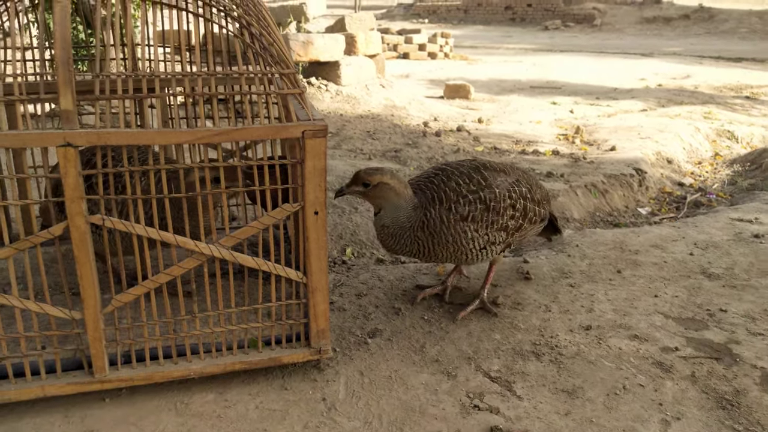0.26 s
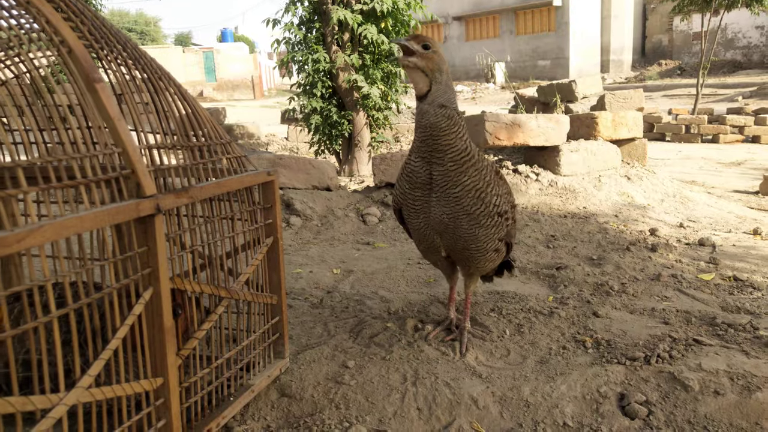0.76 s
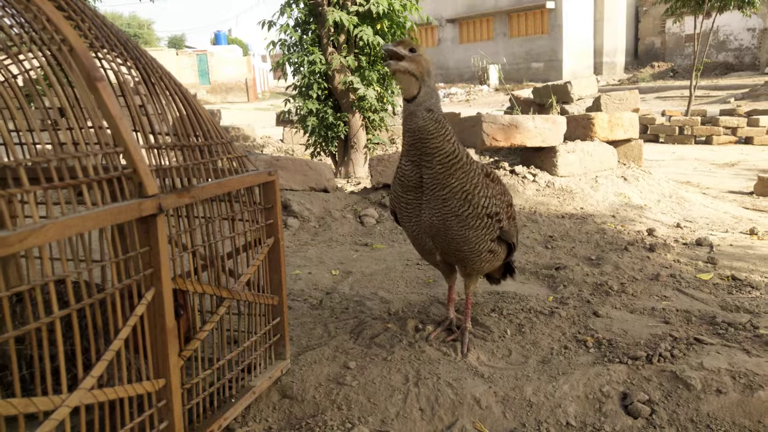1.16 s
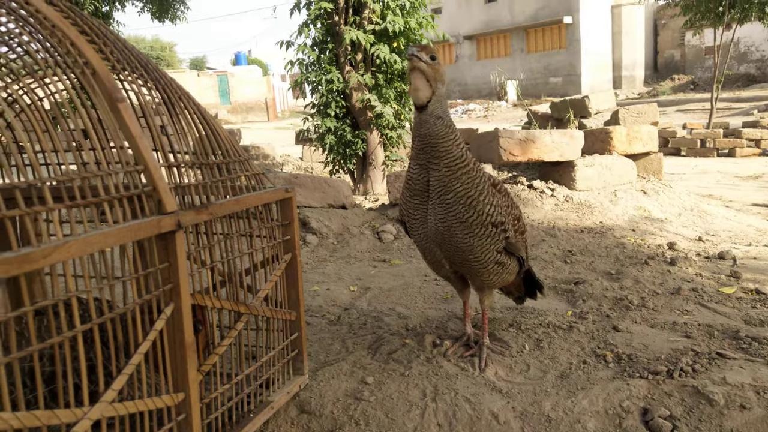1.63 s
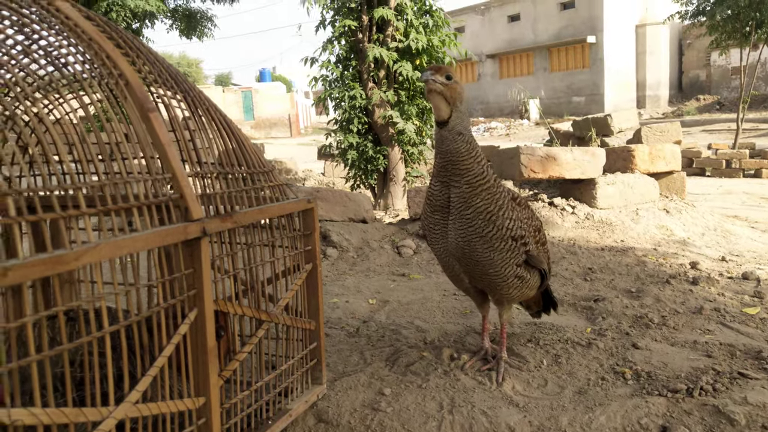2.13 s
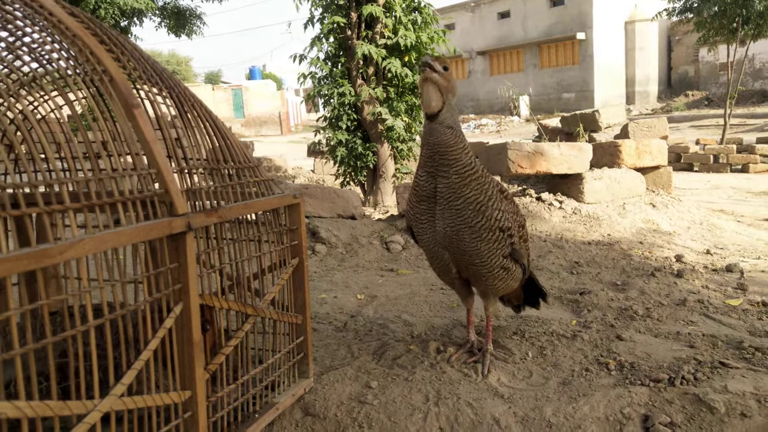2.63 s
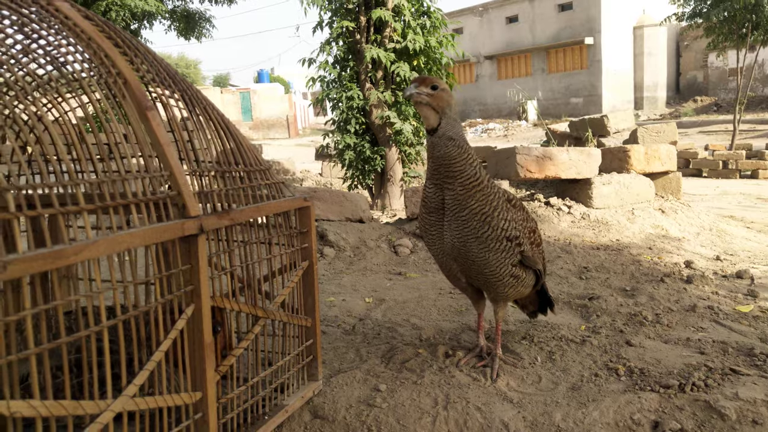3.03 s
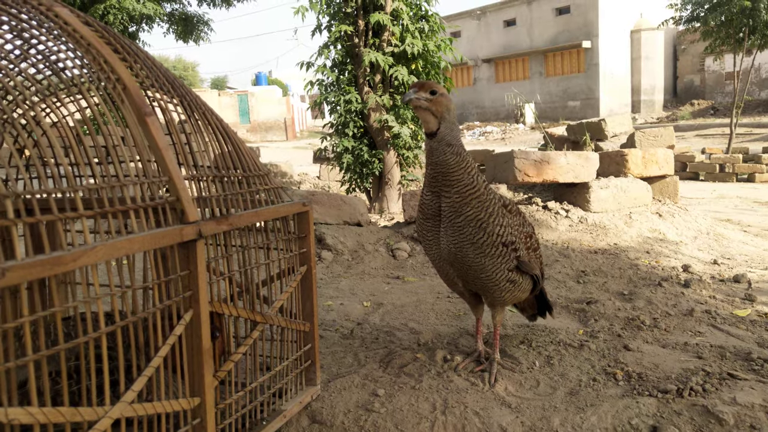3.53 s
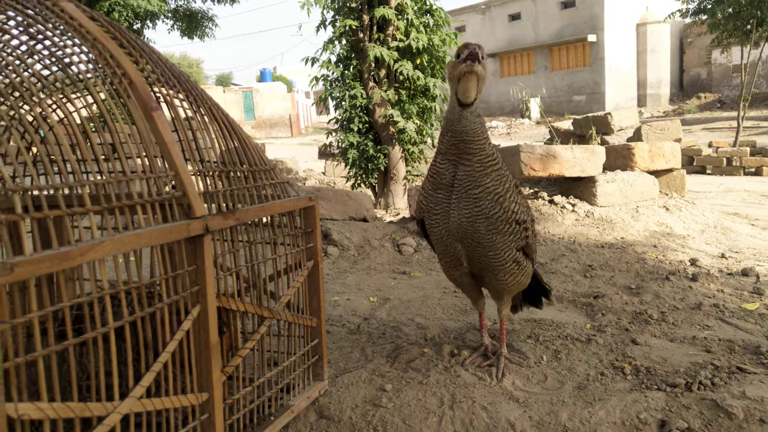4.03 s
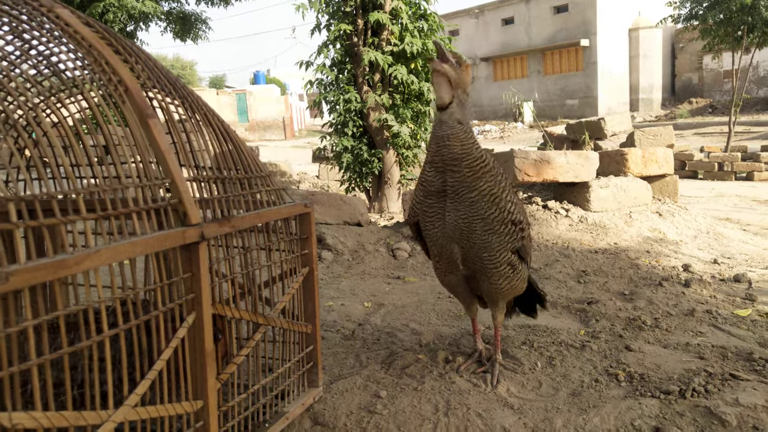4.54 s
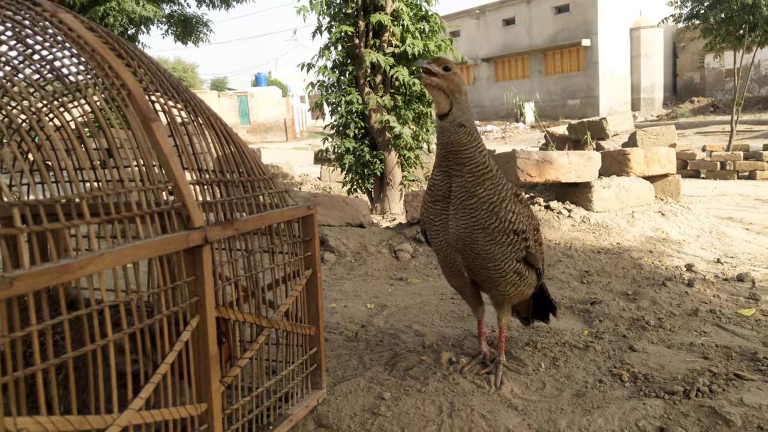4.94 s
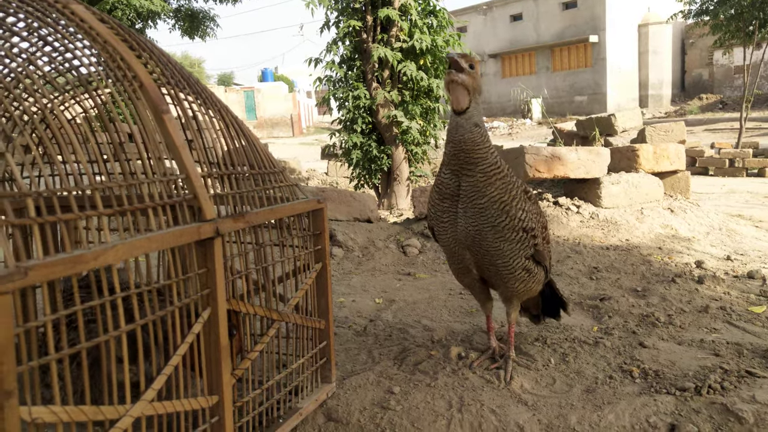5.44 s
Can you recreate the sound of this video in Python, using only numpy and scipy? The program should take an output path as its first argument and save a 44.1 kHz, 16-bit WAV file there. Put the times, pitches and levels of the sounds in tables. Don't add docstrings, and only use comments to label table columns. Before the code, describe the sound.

Outdoors, a handheld stereo microphone catches wind rumble and a brief far pump, then a loud game bird at close range. Its piercing, nearly overloading shriek breaks into two clear tones, followed by rapid harsh notes that each snap into a falling whistle. The pattern repeats with short gaps, filled by a caged bird's thin arched whistles, faint coos, soft leaf murmur and dull yard echoes.

```python
import sys
import numpy as np
from scipy import signal
from scipy.fft import rfft, irfft, next_fast_len
from scipy.io import wavfile
from scipy.ndimage import uniform_filter1d, minimum_filter1d, map_coordinates

SR = 44100
rng = np.random.default_rng(int(sys.argv[2]) if len(sys.argv) > 2 else 0)


def rack_gain(trim_db):
    fader = np.asarray(trim_db, float)
    return 10 ** (fader / 20)


def inscribe(sig):
    pcm = np.round(np.clip(np.atleast_2d(sig).T, -1, 1) * 32767)
    wavfile.write(sys.argv[1], SR, pcm.astype(np.int16))


N = 250047


def unit(x):
    return x / np.sqrt(np.mean(x ** 2) + 1e-20)


def along(points, hz, column=1):
    table = np.transpose(points)
    return np.interp(np.log(hz + 1), np.log(table[0] + 1), table[column])


def wobble(rate, size=N):
    knots = rng.standard_normal(int(size * rate / SR) + 4)
    return map_coordinates(knots, [np.arange(size) * rate / SR])


def filtered(x, response):
    m = next_fast_len(N + SR // 2)
    return irfft(rfft(x, m) * response(np.fft.rfftfreq(m, 1 / SR)), m)[..., :N]


def shaped_noise(spectrum, shape=N):
    return unit(filtered(rng.standard_normal(shape), lambda hz: rack_gain(along(spectrum, hz))))


def causal(spectrum):
    def response(hz):
        cep = irfft(np.log(rack_gain(along(spectrum, hz))))
        cep[1:len(cep) // 2] *= 2
        cep[len(cep) // 2 + 1:] = 0
        return np.exp(rfft(cep))
    return response


def add(out, s, x):
    part = out[round(s * SR):][:len(x)]
    part += x[:len(part)]


def glide(rows, attack, release):
    s, *cols = np.transpose(rows)
    t = np.arange(s[0] - attack, s[-1] + release, 1 / SR)
    gate = np.clip((t - t[0]) / attack, 0, 1) * np.clip((t[-1] - t) / release, 0, 1)
    smooth = [uniform_filter1d(np.interp(t, s, c), size=150, mode="nearest") for c in cols]
    return t, smooth, gate


# time in seconds, rumble in dB, air in dB, leaf rustle over the air in dB.
GUSTS = [(0, -43.5, -60, -3.5), (0.459, -46.5, -63, -5.5), (.53, -52, -56, -4), (2.002, -54, -67.5, 6),
         (2.3, -47, -58, -2.5), (2.7, -58, -60.5, 3.5), (3.1, -49.5, -58, -7), (3.4, -52, -62.5, -11),
         (3.601, -52, -62, 1), (4.3, -53, -51.5, -5), (5.001, -57, -60.5, 3), (5.67, -57, -60.5, -1)]
# frequency in Hz, level in dB.
RUMBLE_SPECTRUM = [(25, -32), (50, -11), (65, 7), (95, -8.5), (130, -2), (200, -4), (300, -27.5),
                   (500, -57.5)]
# frequency in Hz, level in dB.
MURMUR_SPECTRUM = [(150, -28.5), (250, -14), (347, -6.5), (385, -10.5), (474, -11.5), (669, -18.5),
                   (1030, -21.5), (5410, -21.5), (7250, -29), (8180, -63), (15500, -68.5)]


def wind():
    s, rumble_db, air_db, rustle_db = np.transpose(GUSTS)
    t = np.arange(N) / SR
    left, shared, right, middle, sides = rng.standard_normal((5, N))
    lumps = rack_gain(4 * np.array([wobble(16), wobble(16)]))
    lean_db = np.where(t < .5, [[0], [4]], [[4.5], [1.5]])
    buffets = np.array([left + .2 * shared, right + .2 * shared])
    rumble = unit(lumps * filtered(buffets, lambda hz: rack_gain(along(RUMBLE_SPECTRUM, hz))))
    murmur = np.array([middle + .5 * sides, middle - .5 * sides])
    air = unit(filtered(murmur, lambda hz: rack_gain(along(MURMUR_SPECTRUM, hz))))
    leaves = filtered(air, lambda hz: 1 / (1 + (2200 / (hz + 1)) ** 6))
    air = air + (rack_gain(np.interp(t, s, rustle_db)) - 1) * leaves
    drift_db = 1.5 * wobble(8) + 1.5 * wobble(25)
    rumble_gain = rack_gain(np.interp(t, s, rumble_db) + lean_db)
    return rumble_gain * rumble + rack_gain(np.interp(t, s, air_db) + 6 + drift_db) * air


def pump_motor():
    pitch_hz, level_db, overtone_step_db, stop_s = 95, -43.5, -13, 0.53
    turn = 2 * np.pi * np.cumsum(pitch_hz * (1 + 0.015 * wobble(9.8))) / SR
    drone = np.zeros(N)
    for k in range(5):
        drone += rack_gain(overtone_step_db * k ** 0.49 + 5.2 * wobble(32.6)) * np.sin((k + 1) * turn)
    running = np.clip((stop_s - np.arange(N) / SR) / 0.034, 0, 1)
    return rack_gain(level_db + np.array([[-3], [4]])) * running * drone


# start in seconds, end in seconds, first pitch in Hz, last pitch in Hz, level in dB.
DOVE_COOS = [(.02, 0.072, 484, 470, -47), (0.027, .09, 345, 350, -52), (0.167, 0.202, 546, 545, -55),
             (.31, .41, 306, 308, -56), (3.038, 3.203, 459, 476, -53), (3.649, 3.72, 458, 452, -49),
             (3.657, 3.705, 295, 291, -46), (4.389, 4.48, 379.4, 414, -52)]
# start in seconds, end in seconds, first pitch in Hz, last pitch in Hz, level in dB.
BIRD_CHIRPS = [(.095, 0.14, 4200, 3300, -66), (.29, 0.33, 4500, 4800, -60), (0.32, 0.44, 2880, 4500, -59),
               (.19, .215, 3150, 2800, -59), (.385, .41, 2950, 2800, -55), (.485, .512, 3400, 2900, -56),
               (.48, 0.488, 4500, 5400, -49), (1.186, 1.234, 4950, 5900, -50.5),
               (3.265, 3.298, 5940, 5970, -61.5)]


def far_birds():
    out = np.zeros(N)
    for start, end, first, last, db in BIRD_CHIRPS + DOVE_COOS:
        t, (hz,), _ = glide([(start, first), (end, last)], attack=0.0018, release=0.0014)
        swell = rack_gain(db) * np.sqrt(np.hanning(len(t)))
        add(out, t[0], swell * np.sin(2 * np.pi * np.cumsum(hz) / SR))
    return out


# time in seconds, peak in dB.
LOW_THUMPS = [(0.119, -35), (0.198, -35), (0.423, -30), (0.57, -5), (1.267, -23), (2.407, -21.5),
              (3.75, -25), (4.519, -15), (5.246, -14)]


def low_thumps():
    t = np.arange(SR // 8) / SR
    low = np.zeros((2, N))
    for s, db in LOW_THUMPS:
        for side, gain_db, hz in zip(low, (3, 1), (95, 70)):
            thump = np.sin(2 * np.pi * hz * t * (1 - 3 * t))
            add(side, s, rack_gain(db + gain_db - 60 * t / 0.024) * thump)
    return filtered(low, lambda hz: (1j * hz / (60 + 1j * hz)) ** 2)


# time in seconds, level in dB.
GRIT_TICKS = [
    (0.372, -23.5),
    (0.485, -36),
    (4.444, -37),
]


def grit():
    t = np.arange(SR // 8) / SR
    knock = np.sin(2 * np.pi * 1700 * t) + 0.28 * np.sin(2 * np.pi * 4200 * t)
    out = np.zeros(N)
    for s, db in GRIT_TICKS:
        add(out, s, rack_gain(db - 60 * t / 0.0006) * knock)
    return out


def rough_voice(notes, spectrum, rate_hz, wander, scatter_db, hiss, rise, even, attack, twitch, narrow):
    open_db = -13
    speed, level, opened = np.full(N, float(rate_hz)), np.zeros(N), np.ones(N)
    for start, end, *db in notes:
        rows = [(start + attack, db[0]), ((start + end) / 2, db[1]), (end - .001, db[2])]
        t, (gain_db,), gate = glide(rows, attack=attack, release=0.0037)
        add(level, t[0], rack_gain(gain_db) * gate ** 2)
        top_hz, peak = db[3:] or (rate_hz, .7)
        span = slice(round(t[0] * SR), round(t[0] * SR) + len(t))
        opened[span] = np.clip(np.linspace(0, 1.6, len(t)), 0, 1)
        u = np.linspace(-peak, 1 - peak, len(t))
        away = np.abs(u) / np.where(u < 0, peak, .75)
        speed[span] = top_hz * (1 - rise * away ** 1.6)
    cycle = np.cumsum(speed * np.exp(wander * wobble(twitch))) / SR
    slaps = np.diff(np.floor(cycle), prepend=0) * rack_gain(scatter_db * rng.standard_normal(N))
    slaps = uniform_filter1d(slaps, size=4)
    air = rng.standard_normal(N) * (1.4 - cycle % 1)
    source = unit(slaps) + hiss * unit(air)
    low = unit(filtered(source, causal([(hz * narrow, db) for hz, db in spectrum])))
    wide = unit(filtered(source, causal(spectrum)))
    sound = unit(low * np.cos(opened * np.pi / 2) + wide * np.sin(opened * np.pi / 2))
    swing = np.sqrt(np.abs(uniform_filter1d(sound ** 2, size=70)) + 0.028)
    sound = unit(sound / swing ** even)
    high = filtered(sound, lambda hz: 1 / (1 + (3000 / (hz + 1)) ** 4))
    return level * (sound - high * (1 - np.clip(level / rack_gain(open_db), 0, 1) ** 0.71))


RELOCK_S = 0.002
# start in seconds, burst in dB, middle in dB, break between the cries in dB.
BOUT_SHRIEKS = [(.526, -13.5, -12.5, -18), (1.215, -7.5, -12, -20), (2.367, -9.5, -12, -21.5),
                (3.7, -11.5, -13, -22.5), (4.476, -17.5, -12.5, -22), (5.198, -16.5, -9.5, -21)]
# frequency in Hz, level in dB.
SHRIEK_SPECTRUM = [(180, -79), (300, -21.5), (744, -29.5), (892, -17.5), (1200, -22.5), (1640, -23),
                   (2830, -2.5), (3070, -12), (3340, -4.5), (4570, -16), (7250, -8.5), (8700, -17),
                   (15500, -55)]


def shrieks():
    snap_lead_s = .004
    build_db, snap_db, regrip_db = -9, -13.5, -9
    notes = []
    for (s, burst, middle, split), held, cry in zip(BOUT_SHRIEKS, HELD_CRIES, FALLING_CRIES):
        notes.append((s, held[0] - RELOCK_S, burst, middle, build_db))
        notes.append((held[1] - snap_lead_s, cry[0] - RELOCK_S, snap_db, split, regrip_db))
    hush = np.ones(N)
    for start, slip, *_ in SHRIEK_CATCHES:
        hush[round((start - .001) * SR):round((slip + .002) * SR)] = 1 - .7
    return uniform_filter1d(hush, size=90) * rough_voice(
        notes, SHRIEK_SPECTRUM, rate_hz=1500, wander=.2, scatter_db=3.5, hiss=.5, rise=.1, even=.6,
        attack=.006, twitch=480, narrow=.8)


# start in seconds, first level in dB, middle level in dB,
# last level in dB, overtones of the tone that follows in dB.
NOTE_RASPS = [(.763, -38, -17.5, -11.5, -14), (.878, -30.5, -15.5, -10.5, -16),
              (0.994, -27.5, -15, -15.5, -17.5), (1.461, -29.5, -15.5, -9, -12),
              (1.586, -26.5, -12, -25.5, -12.5), (1.704, -30.5, -14.5, -12.5, -16),
              (1.825, -29.5, -20, -15, -21), (2.61, -44.5, -18.5, -11.5, -11.5),
              (2.727, -29.5, -13, -12.5, -15.5), (2.843, -28.5, -14.5, -14, -19),
              (3.942, -36, -17.5, -10.5, -13), (4.057, -30, -12, -18.5, -14),
              (4.172, -27.5, -15.5, -10, -11), (4.737, -28, -17, -9, -11.5), (4.853, -32, -18, -13, -12),
              (4.975, -29, -14.5, -13, -16), (5.472, -26.5, -15.5, -11, -11),
              (5.587, -29, -17, -11.5, -11.5)]
# start in seconds, end in seconds, first, middle and last level in dB.
HOARSE_NOTE = [
    (2.973, 3.029, -24.5, -16.5, -41.5),
]
# frequency in Hz, level in dB.
RASP_SPECTRUM = [(120, -52), (200, -24.5), (378, -26), (1050, -22.5), (1880, -1.5), (2400, -1), (3010, -7),
                 (3680, -7), (4500, -19.5), (5390, -4), (8200, -18), (11600, -33), (15500, -28.5)]


def rasps():
    sigh_s, sigh_db = 0.011, -32.5
    notes = [(s - .002, fall[0] - RELOCK_S, *db) for (s, *db, _), fall in zip(NOTE_RASPS, NOTE_FALLS)]
    for _, end, *_ in FALLING_CRIES:
        notes.append((end, end + sigh_s, sigh_db - 0.5, sigh_db, sigh_db - 3.5))
    return rough_voice(notes + HOARSE_NOTE, RASP_SPECTRUM, rate_hz=560, wander=.16, scatter_db=3, hiss=1.1,
                       rise=.3, even=.7, attack=.002, twitch=400, narrow=.68)


# start in seconds, end in seconds, level in dB, # fastest pulse
# rate in Hz, moment of that rate as a share of the length.
WEAK_CROAKS = [(1.112, 1.136, -21, 360.4, .5), (1.826, 1.852, -21.5, 476, 0.75),
               (1.966, 2.025, -23, 409, 0.91), (2.969, 3.027, -22.5, 429.2, 0.55),
               (4.299, 4.35, -20.5, 468.3, 0.4), (5.097, 5.122, -25, 331, 0.48)]
# frequency in Hz, level in dB.
CROAK_SPECTRUM = [(150, -59.5), (330, -8.5), (600, -23.5), (1250, -2.5), (1700, 0.5), (2300, -18.5),
                  (3000, -21.5), (3900, -15), (5500, -16), (9000, -34.5), (15500, -41)]


def croaks():
    notes = [(a, b, db - 7.5, db, db - 5.5, *pulses) for a, b, db, *pulses in WEAK_CROAKS]
    return rough_voice(notes, CROAK_SPECTRUM, rate_hz=400, wander=.05, scatter_db=2.2, hiss=.4, rise=.3,
                       even=.1, attack=.002, twitch=280, narrow=.9)


def arch(start, end, peak, top_hz, last_hz, db, bend, climb, fade_db, late, swell_db, open_db, close_db,
         shut, speed):
    s = np.linspace(start, end, num=12)
    u = (s - peak) / (end - peak)
    hz = top_hz - (top_hz - last_hz) * np.abs(u) ** bend * np.where(u < 0, climb, 1)
    closed = 1 / (1 + np.exp((shut - u) / speed))
    level_db = db - swell_db * (1 - closed) - fade_db * np.clip(u, 0, 1) ** late
    return np.transpose([s, hz, level_db, open_db - close_db * closed])


# start in seconds, end in seconds, first pitch in Hz, last pitch in Hz, level in dB.
HELD_CRIES = [(0.57, 0.602, 1974, 1992, -10), (1.256, 1.284, 2114, 2000, -9.5),
              (2.407, 2.441, 2060, 2004, -9), (3.742, 3.775, 2028, 1984, -11),
              (4.517, 4.546, 2646, 2664, -6.5), (5.244, 5.267, 2658, 2678, -6.5)]


def held_cries():
    sag_db, over_db, crack_over_db, crack_s, crack_hz = 0.5, -2, -1, 0.0045, 1800
    notes = []
    for start, end, first, last, db in HELD_CRIES:
        tired_db = db - sag_db
        notes.append([(start, first, db, over_db), (end - crack_s, last, tired_db, over_db),
                      (end - crack_s / 2, 1.06 * crack_hz, tired_db - 2.5, crack_over_db),
                      (end, crack_hz, tired_db, crack_over_db)])
    return notes


# start in seconds, end in seconds, top pitch in Hz, last pitch in Hz, level in dB.
FALLING_CRIES = [(0.621, 0.675, 2009, 1340, -7.5), (1.307, 1.365, 2026, 1422, -7),
                 (2.462, 2.516, 2030, 1382, -8), (3.795, 3.846, 2007, 1393, -7.5),
                 (4.569, 4.626, 2040, 1470, -6.5), (5.292, 5.352, 2038, 1466, -7)]


def falling_cries():
    shape = dict(bend=1.8, climb=0.22, fade_db=22.5, late=4.45, swell_db=3.5, open_db=1, close_db=16.5,
                 shut=0.3, speed=0.28)
    return [arch(start, end, start + 0.0085, *rest, **shape) for start, end, *rest in FALLING_CRIES]


# start in seconds, end in seconds, top pitch in Hz,
# last pitch in Hz, level in dB.
NOTE_FALLS = [(0.789, 0.82, 1775, 1048, -7), (0.907, 0.932, 1750, 1040, -6), (1.026, 1.045, 1800, 1065, -3),
              (1.485, 1.524, 1888, 1152, -7), (1.616, 1.642, 1839, 1153, -6.5),
              (1.739, 1.759, 1828, 1145, -4), (1.855, 1.876, 1515, 1118, -10.5),
              (2.632, 2.669, 1886, 1155, -7.5), (2.763, 2.784, 1856, 1133, -7.5),
              (2.883, 2.902, 1850, 1118, -6), (3.966, 4.002, 1817, 1115, -8),
              (4.089, 4.111, 1780, 1134, -6), (4.205, 4.221, 1800, 1086, -5.5),
              (4.763, 4.798, 1893, 1240, -6.5), (4.875, 4.912, 1785, 1125, -6.5),
              (5.009, 5.03, 1750, 1137, -5), (5.498, 5.532, 1890, 1399, -8),
              (5.611, 5.645, 1800, 1207, -6.5)]


def short_falls():
    fall_speed = 26000
    shape = dict(bend=1.55, climb=.35, fade_db=25, late=3.4, swell_db=6.5, open_db=13.5, close_db=27,
                 shut=0.33, speed=0.19)
    notes = []
    for rasp, (start, end, top, last, db) in zip(NOTE_RASPS, NOTE_FALLS):
        peak = end - (top - last) / fall_speed
        notes.append(arch(start, end, peak, top, last, db, **shape) + [0, 0, 0, rasp[4]])
    return notes


# start in seconds, end in seconds, pitch in Hz,
# level in dB, overtones in dB.
RASP_STUMBLES = [(1.604, 1.61, 1740, -14, 1.5), (1.729, 1.735, 2600, -11, -13),
                 (1.009, 1.02, 1950, -14.5, -22), (4.19, 4.2, 1900, -11.5, -20.5)]


def stumbles():
    return [[(a, hz, *db), ((a + b) / 2, hz, *db), (b, .9 * hz, *db)] for a, b, hz, *db in RASP_STUMBLES]


# start in seconds, slip in seconds, end in seconds,
# pitch in Hz, level in dB.
SHRIEK_CATCHES = [(1.223, 1.229, 1.235, 1722, -16), (2.377, 2.383, 2.389, 1695, -18.5),
                  (3.709, 3.714, 3.727, 1702, -19.5), (4.482, 4.488, 4.499, 1750, -14.5),
                  (5.206, 5.211, 5.219, 1783, -13)]


def catches():
    slip_ratio, sag_ratio, slip_s, fade_db = .83, .77, .004, 11.5
    grip_over_db, slip_over_db = 5.5, 10.5
    notes = []
    for start, slip, end, hz, db in SHRIEK_CATCHES:
        notes.append([(start, .95 * hz, db, grip_over_db), (start + 0.0018, hz, db, grip_over_db),
                      (slip, hz, db, grip_over_db),
                      (slip + slip_s, slip_ratio * hz, db - fade_db / 2, slip_over_db),
                      (end, sag_ratio * hz, db - fade_db, slip_over_db)])
    return notes


# start in seconds, end in seconds, first pitch in Hz,
# last pitch in Hz, level in dB.
FLUTTER_LEADS = [(0.552, .565, 1940, 2050, -18), (2.395, 2.403, 2080, 1984, -18),
                 (3.735, 3.74, 1960, 2000, -11), (4.506, 4.513, 2020, 1854, -19),
                 (5.241, 5.237, 2077, 2450, -3), (0.779, 0.784, 2100, 2510, -19.5),
                 (.893, 0.903, 2313, 2560, -17), (1.836, 1.851, 1908, 2200, -20),
                 (2.625, 2.63, 2097, 2730, -15.5), (2.742, 2.75, 2228, 2560, -14.5),
                 (2.858, 2.874, 2200, 2518, -16.5), (3.957, 3.963, 1990, 2530, -15.5),
                 (4.069, 4.076, 1940, 2049, -19), (5.486, 5.496, 2200, 2440, -22),
                 (5.595, 5.605, 1950, 2400, -19), (1.715, 1.719, 1970, 2200, -17.5)]


def leads():
    return [[(a, first, db, -15), (b, last, db, -15)] for a, b, first, last, db in FLUTTER_LEADS]


# frequency in Hz, level in dB.
OVERTONE_SPECTRUM = [(2500, 4.5), (4000, -1.5), (5300, 0.5), (6000, -4), (8000, -11), (10000, -22.5),
                     (12000, -24), (15000, -15)]
# frequency in Hz, level in dB.
LEAK_SPECTRUM = [(250, -35), (900, -7), (1600, -4), (3000, 4), (6500, 2), (9000, -22.5), (15500, -19.5)]


def clear_voice():
    grip_s, catch_grip_s, cut_s, let_go_s = 0.0011, .004, 0.0015, .008
    # notes, onset s, ending s, unsteadiness dB, flutter dB
    groups = [(held_cries(), grip_s, cut_s, .2, 0), (falling_cries(), grip_s, let_go_s, .2, 0),
              (short_falls(), grip_s, let_go_s, .5, 0), (stumbles(), catch_grip_s, cut_s, .5, 0),
              (catches(), catch_grip_s, cut_s, .5, 0), (leads(), catch_grip_s, cut_s, .5, 3)]
    out, level = np.zeros(N), np.zeros(N)
    for notes, onset, release, bead_db, flutter_db in groups:
        for rows in notes:
            t, (hz, db, over_db), _ = glide(rows, attack=.003, release=release)
            size = len(t)
            gate = np.clip((t - t[0]) / onset, 0, 1) * np.clip((t[-1] - t) / release, 0, 1)
            hz = hz * (1 - 0.066 * np.exp((t[0] - t) / 0.0016))
            turn = 2 * np.pi * np.cumsum(hz * (1 + 0.0028 * wobble(300, size=size))) / SR
            wave = np.cos(turn)
            for k in range(2, 10):
                tilt_db = over_db - (k - 2) * np.where(over_db > 0, .9, -.25) * over_db
                tilt_db = tilt_db + (.1 + .12 * k) * wobble(120, size=size)
                lag = 1.1 * (k - 1) + .004 * k * k * wobble(500, size=size)
                strength = rack_gain(along(OVERTONE_SPECTRUM, k * hz) + tilt_db) * (k * hz < 15500)
                wave += strength * np.cos(k * turn - lag)
            db = db + flutter_db * wobble(420, size=size)
            add(out, t[0], np.sqrt(2) * rack_gain(db + bead_db * wobble(130, size=size)) * gate * wave)
            add(level, t[0], rack_gain(db) * gate)
    linger = np.exp(-1 / (.006 * SR))
    level = signal.lfilter([1 - linger], [1, -linger], level)
    out = filtered(out, lambda hz: 1j * hz / (300 + 1j * hz))
    return out + rack_gain(-23.5) * level * shaped_noise(LEAK_SPECTRUM)


# frequency in Hz, left minus right in dB, left lead in radians.
PORT_PATHS = [(1170, 1, 0.6), (1444, 4, -1.29), (1750, -8.5, -0.044), (2307, 3, 1.58), (2752, -2.5, -1.85),
              (3400, 2.5, -0.14), (3700, 2, -0.57), (5300, 1.5, 1.44), (6390, 5, -1.97), (6670, 3, 0.75),
              (7790, -2, -1.1), (8940, 5.5, -0.29), (14100, 7, -0.98)]
# start in seconds, contrast between ports as a factor, lead in radians per kHz.
HEAD_TURNS = [(0, 1.5, -0.14), (1.2, 1.3, -0.12), (2.36, 1.8, -0.052), (3.69, 1.58, -0.02),
              (4.46, 1.2, -0.1), (5.19, 1.2, -0.05)]


def francolin():
    voice = shrieks() + clear_voice() + rasps() + croaks()
    bout = np.searchsorted([row[0] for row in HEAD_TURNS], np.arange(N) / SR, "right") - 1
    half = np.array([[.5], [-.5]])
    out = np.zeros((2, N))
    for k, (_, contrast, lead) in enumerate(HEAD_TURNS):
        def ports(hz):
            phase = half * (along(PORT_PATHS, hz, column=2) + lead * hz / 1000)
            return rack_gain(half * contrast * along(PORT_PATHS, hz)) * np.exp(1j * phase)
        out += filtered(voice * (bout == k), ports)
    return voice, out


# delay in seconds, level in dB.
WALL_ECHOES = [(0.046, -43.5), (0.074, -46.5), (0.105, -43), (.128, -48), (.15, -35.5), (.202, -37),
               (.26, -48.5)]
# frequency in Hz, fall by 60 dB in seconds.
YARD_DECAY = [(300, .3), (2000, 1), (5000, 0.54), (10000, 0.18)]


def yard(x):
    hz, t, z = signal.stft(rng.standard_normal((2, SR)), SR, nperseg=256)
    tail = signal.istft(z * rack_gain(-60 * t / along(YARD_DECAY, hz)[:, None]), SR, nperseg=256)[1]
    build = np.clip(np.arange(tail.shape[1]) / (.04 * SR), 0, 1)
    answer = rack_gain(-30) * tail / np.linalg.norm(tail[0]) * build
    for s, db in WALL_ECHOES:
        blur = rng.standard_normal((2, 260)) * rack_gain(-np.arange(260) * 1.2)
        answer[:, round(s * SR):][:, :260] += rack_gain(db) * blur / np.linalg.norm(blur[0])
    wet = signal.fftconvolve(x[None], answer, axes=1)[:, :N]
    return filtered(wet, lambda hz: 1 / (1 + 1j * hz / 5000))


# time in seconds, pitch in Hz, level in dB.
CAGE_WHISTLES = [
    [(1.024, 3295, -30), (1.09, 3340, -24.5), (1.1, 3240, -31), (1.108, 3370, -44)],
    [(1.757, 3300, -39.5), (1.767, 3320, -27), (1.793, 3370, -21), (1.843, 3340, -26), (1.857, 3280, -35.5),
     (1.866, 3370, -42.5)],
    [(2.2, 3170, -45), (2.208, 3240, -29.5), (2.224, 3382, -18.5), (2.248, 3443, -17), (2.302, 3393, -17.5),
     (2.33, 3290, -28.5), (2.34, 3500, -50.5)],
    [(2.937, 3225, -41), (2.945, 3293, -28.5), (2.957, 3356, -22.5), (2.983, 3443, -22),
     (3.023, 3400, -21.5), (3.045, 3400, -48.5)],
    [(3.44, 3300, -35.5), (3.452, 3297, -26), (3.464, 3361, -19.5), (3.502, 3400, -18),
     (3.516, 3427, -19.5), (3.576, 3368, -21), (3.596, 3300, -26), (3.61, 3380, -57)],
    [(4.3, 3120, -48), (4.31, 3310, -25.5), (4.326, 3400, -17), (4.348, 3574, -21.5), (4.374, 3620, -21.5),
     (4.41, 3554, -18.5), (4.424, 3452, -22.5), (4.436, 3435, -42)],
    [(5.026, 3230, -39), (5.038, 3330, -26), (5.056, 3444, -22), (5.082, 3473, -23.5), (5.136, 3405, -23),
     (5.153, 3401, -47.5)],
]
# frequency in Hz, level in dB.
HAZE_SPECTRUM = [(300, -25.5), (1500, -16), (2700, -12), (3400, 2), (4500, -9), (7000, -20),
                 (8000, -25.5), (15000, -35.5)]


def caged_bird():
    tone, level = np.zeros(N), np.zeros(N)
    for rows in CAGE_WHISTLES:
        t, (hz, db), gate = glide(rows, attack=.003, release=.004)
        swell = rack_gain(db + 0.65 * wobble(60, size=len(t))) * gate
        turn = 2 * np.pi * np.cumsum(hz * (1 + 0.0023 * wobble(150, size=len(t)))) / SR
        add(tone, t[0], swell * (np.sin(turn) + rack_gain(-46.5) * np.sin(2 * turn)))
        add(level, t[0], swell)
    level = uniform_filter1d(level, size=600) * rack_gain(2 * wobble(45))
    haze = level * shaped_noise(HAZE_SPECTRUM, (2, N))
    port_gain = rack_gain([[-1.5], [2.5]]) * np.sqrt(2) * rack_gain(6.5)
    port_phase = np.exp(1j * np.array([[1.1], [-1.1]]))
    whistle = filtered(tone, lambda hz: port_gain * port_phase)
    return tone * rack_gain(7.0), whistle + rack_gain(-14.5) * haze


def scene():
    voice, near = francolin()
    tone, caged = caged_bird()
    background = wind() + pump_motor() + far_birds() + low_thumps() + grit()
    return background + near + caged + yard(voice + 0.44 * tone)


def low_pass(x):
    return signal.sosfilt(signal.butter(12, 15730, fs=SR, output="sos"), x)


def record(dry):
    limit_db, limit_s = -1, .003
    dry = dry + rack_gain(-80) * rng.standard_normal(dry.shape)
    need = np.minimum(1, rack_gain(limit_db) / (np.abs(dry).max(axis=0) + 1e-9))
    held = minimum_filter1d(need, size=round(2 * limit_s * SR))
    dry = dry * uniform_filter1d(held, size=round(limit_s * SR))
    top, hard = 1.05, 5
    flat = dry / (1 + np.abs(dry / top) ** hard) ** (1 / hard)
    flat = dry + filtered(flat - dry, lambda hz: 1j * hz / (160 + 1j * hz))
    mix = filtered(flat, lambda hz: (1j * hz / (42 + 1j * hz)) ** 3 * (hz < 15750))
    return low_pass(mix)


dry = scene()
out = record(dry)
inscribe(out)
```